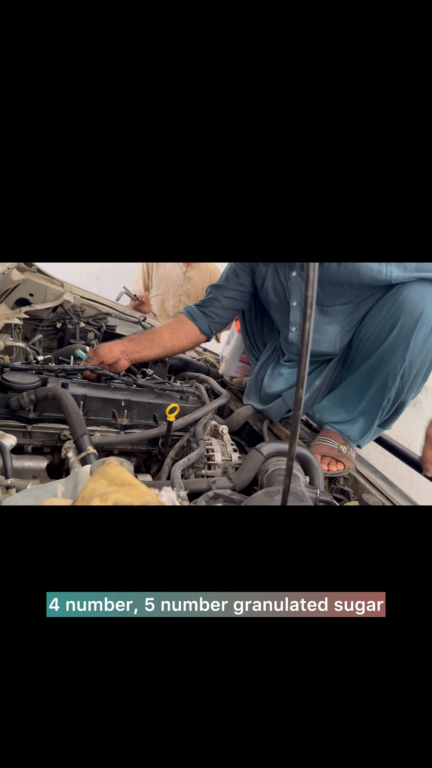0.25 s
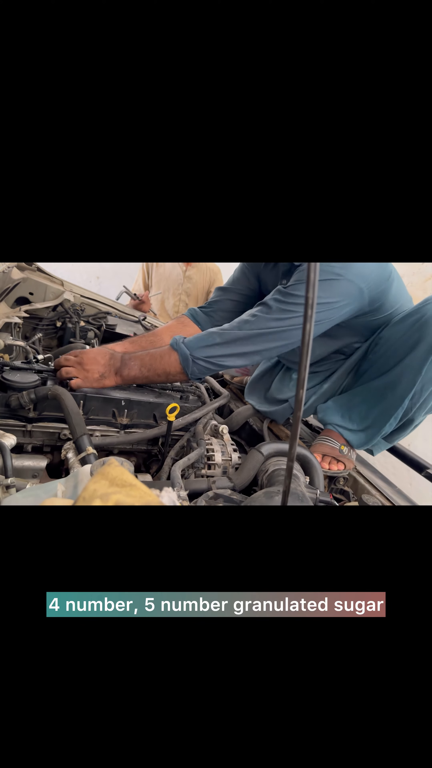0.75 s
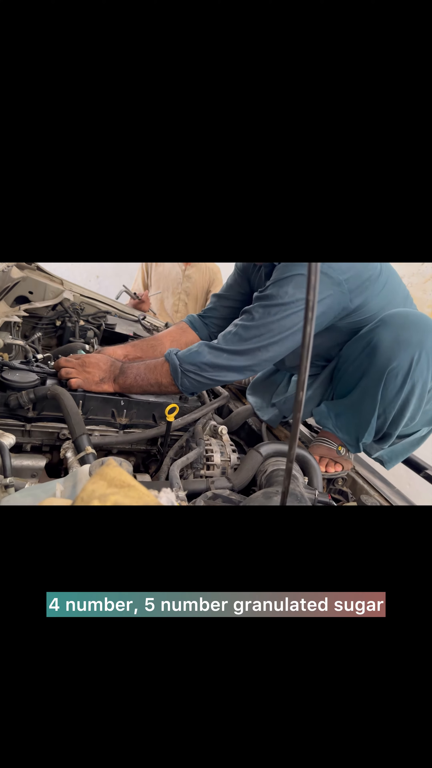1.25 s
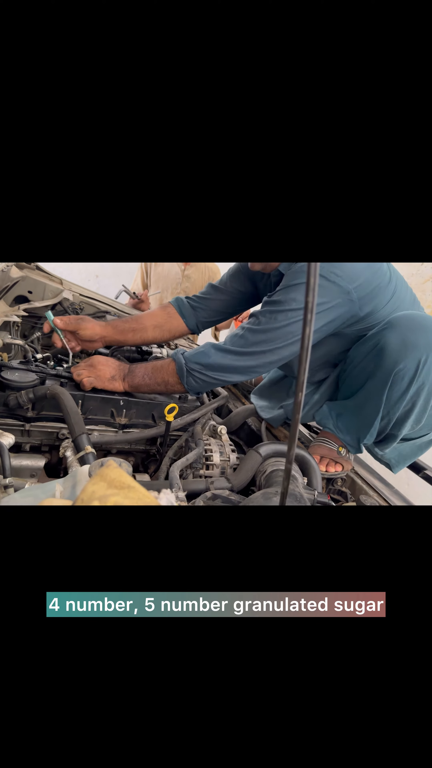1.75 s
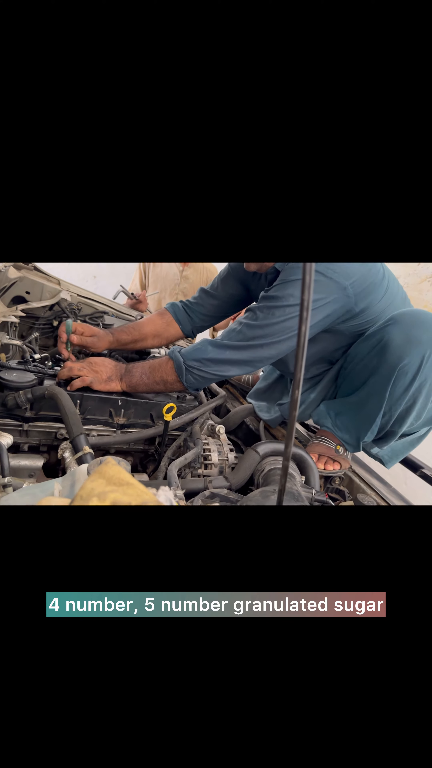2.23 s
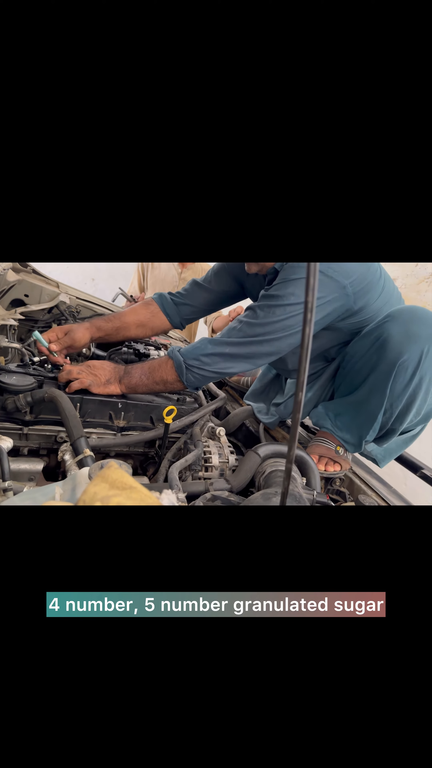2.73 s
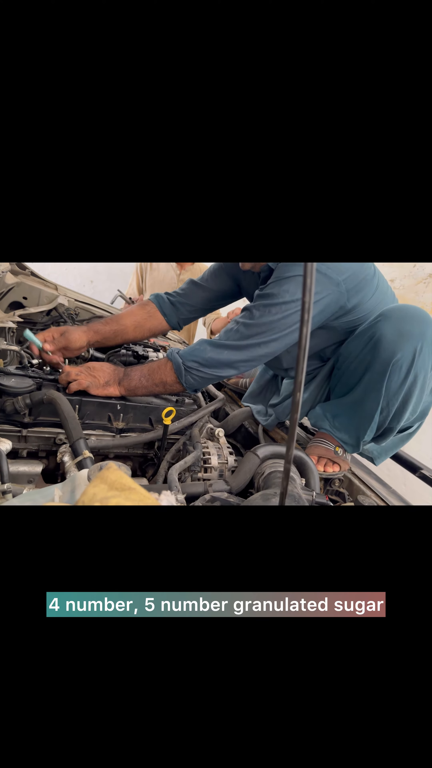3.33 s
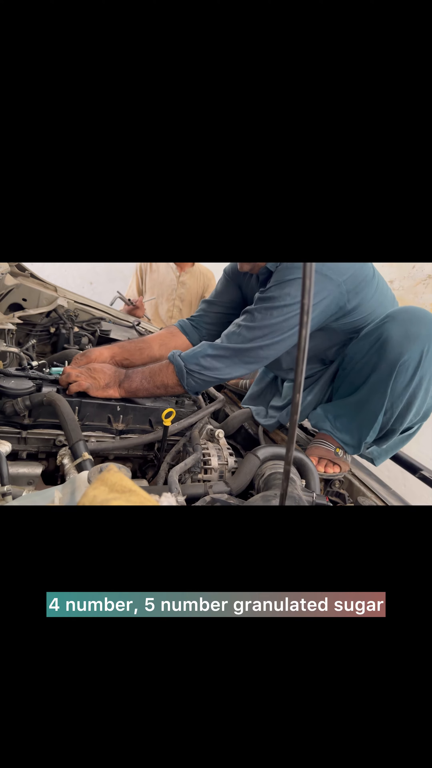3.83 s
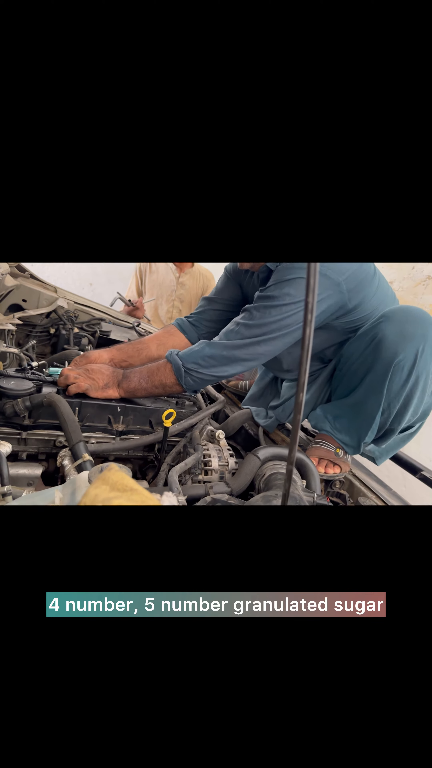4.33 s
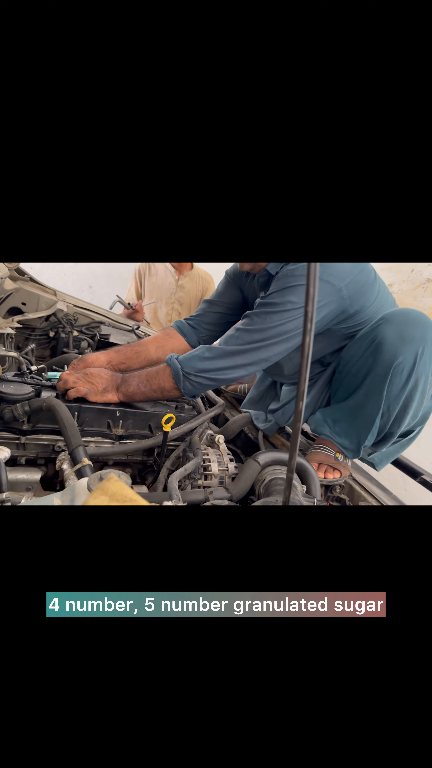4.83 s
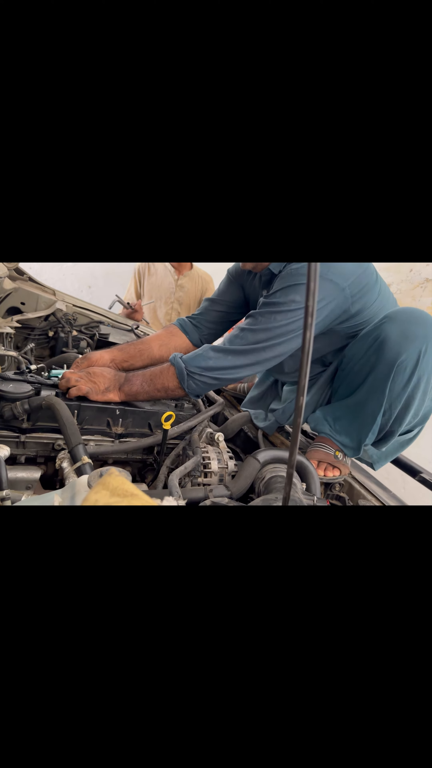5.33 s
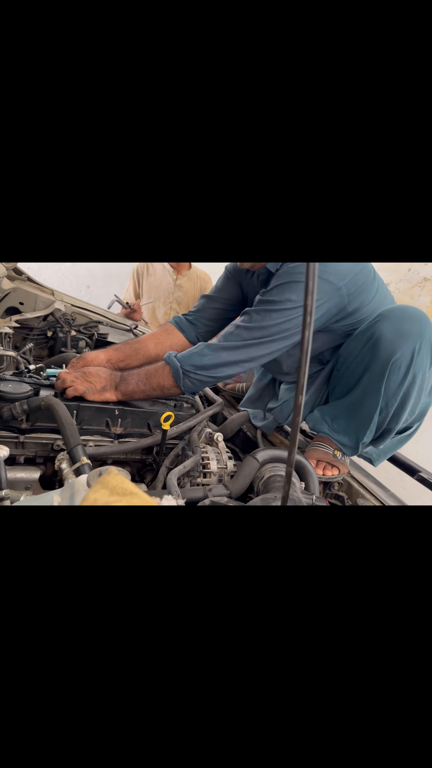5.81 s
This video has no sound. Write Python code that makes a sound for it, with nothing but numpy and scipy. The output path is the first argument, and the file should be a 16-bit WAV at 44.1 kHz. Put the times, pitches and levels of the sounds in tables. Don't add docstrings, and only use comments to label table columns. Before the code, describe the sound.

A five-cylinder diesel idles unevenly up close, hard metallic knocks and sharp ticks over a low hum and a puffing rush of air.

```python
import sys
import numpy as np
from scipy import signal
from scipy.fft import rfft, irfft, next_fast_len
from scipy.io import wavfile
from scipy.ndimage import uniform_filter1d

SR = 44100
rng = np.random.default_rng(int(sys.argv[2]) if len(sys.argv) > 2 else 0)


def voltage_ratio(decibels):
    exponent = np.asarray(decibels, float) / 20
    return 10 ** exponent


def log_audio(samples):
    frames = np.atleast_2d(samples).T
    limited = np.clip(frames, -1, 1)
    pcm = np.round(limited * 32767).astype(np.int16)
    wavfile.write(sys.argv[1], SR, pcm)


N = 267687


def evened(x):
    return x / np.sqrt(np.mean(x ** 2) + 1e-20)


def read(points, hz):
    f, value = np.transpose(points)
    return np.interp(np.log(hz + 1), np.log(f + 1), value)


def drift(rate_hz):
    t = np.arange(0, N + 256, 256) / SR
    f = np.geomspace(rate_hz / 20, rate_hz, num=12)[:, None]
    sines = np.sin(2 * np.pi * (f * t + rng.random(f.shape))) / np.sqrt(f)
    return np.interp(np.arange(N) / SR, t, evened(sines.sum(0)))


# start_s [s], level_db [dB], pitch_hz [Hz], decay_s [s to -60 dB]
BLOWS = [
    (3.17, -55, 592, .6),
    (3.27, -55, 574, 0.45),
    (4.03, -57, 578, 0.46),
    (4.14, -55, 600, 0.37),
    (4.75, -52.5, 594, .5),
    (4.85, -50.5, 595, 0.34),
    (5.6, -58, 590, 0.35),
    (5.64, -50.5, 583, 0.25),
]


def far_blows():
    out, t = np.zeros(N + SR), np.arange(SR) / SR
    soft_start = np.minimum(t / 0.024, 1)
    for start_s, level_db, pitch_hz, decay_s in BLOWS:
        fade = voltage_ratio(level_db + 7.5 - 60 * t / decay_s)
        blow = fade * soft_start * np.sin(2 * np.pi * pitch_hz * t)
        start = round(start_s * SR)
        out[start:start + SR] += blow[:N + SR - start]
    return out[:N]


# multiple [of its speed], level_db [dB rms]
MOTOR_TONES = [(1, -72), (2, -69.5), (5, -72), (7, -55), (9, -63.5), (10, -79), (12, -62), (14, -61.5),
               (16, -64.5)]


def motor_drone():
    speed_hz = 46.71
    out, t = np.zeros(N), np.arange(N) / SR
    for multiple, level_db in MOTOR_TONES:
        waver_db = 1.2 * drift(5.0)
        tone = np.cos(2 * np.pi * (multiple * speed_hz * t + rng.random()))
        out += voltage_ratio(level_db + 3.0 + waver_db) * tone
    return out


# pitch_hz [Hz], decay_s [s to -60 dB], level_db [dB]
SHOP_BANDS = [
    (204, 0.087, -20.5),
    (756, 0.21, 12.5),
    (1870, 0.41, -10.5),
    (2970, 0.46, 8),
    (5660, 0.21, 2.5),
    (9600, 0.17, -2),
    (10500, .1, -60),
]


def shop(x):
    taps = np.zeros((2, SR // 2))
    grid = np.arange(100, SR // 2 - 20, 20)
    at = grid + rng.integers(0, 20, (2, len(grid)))
    np.put_along_axis(taps, at, rng.choice([-1., 1.], at.shape), 1)
    hz, t, z = signal.stft(taps, SR, nperseg=256)
    bands = np.array(SHOP_BANDS)
    decay_s = read(bands[:, [0, 1]], hz)[:, None]
    level_db = read(bands[:, [0, 2]], hz)[:, None]
    tail = signal.istft(z * voltage_ratio(level_db - 60 * t / decay_s), SR, nperseg=256)[1]
    return signal.fftconvolve(x[None], tail / np.linalg.norm(tail[0]), axes=1)[:, :N]


# start_s [s], speed_hz [engine cycles per s]
IDLE_SPEED = [(0.0, 11.255), (0.42, 11.26), (0.85, 11.458), (1.25, 11.354), (1.7, 11.458), (2.05, 11.356),
              (2.42, 11.407), (2.8, 11.329), (3.15, 11.401), (3.47, 11.347), (3.85, 11.434), (4.27, 11.352),
              (4.72, 11.442), (4.97, 11.385), (5.4, 11.476), (6.07, 11.474)]


def crank():
    first_knock_s = .0709
    turns = np.cumsum(np.interp(np.arange(N) / SR, *np.transpose(IDLE_SPEED))) / SR
    return turns - turns[round(first_knock_s * SR)] + 1


# delay_ms [ms], then
# sump_db, block_db, cover_db, head_db, pump_db, pipes_db, injector_db, crack_db [dB]
CYLINDERS = [
    (1.501, -3, -1, 0.5, -2.5, 0.5, 5, -2, -1),
    (2, -5, -6.5, 3.5, -6.5, 1, -2, -2, -8),
    (1.462, -6, -20, -8, -13, -12, -15, -10, -32),
    (.3, 0.5, -12, -4, -3, 1, -7, 5, -8.5),
    (1.288, -11, -39, -11, -9, 1, -1, 9.5, -5),
]


def firings(turns):
    count = len(CYLINDERS)
    at = np.flatnonzero(np.diff(np.floor(turns * count)) > 0)
    cylinder = np.round(turns[at] * count).astype(int) % count
    delay_ms = np.transpose(CYLINDERS)[0][cylinder] + .04 * rng.standard_normal(len(at))
    at = np.clip(at + (delay_ms * SR / 1000).astype(int), 0, N - 1)
    return at, cylinder


# pitch_hz [Hz], level_db [dB per Hz]
RUSH_COLOR = [(40, -49), (70, -5.5), (110, -13), (170, -8.5), (340, -15), (500, -7.5), (900, -13),
              (1300, -10), (1800, -12), (3000, -7.5), (3500, -15), (4650, -18), (7500, -16.5), (10200, -22),
              (15000, -23.5)]
# pitch_hz [Hz], likeness [0-1]
RUSH_LIKENESS = [(100, .995), (260, .96), (500, .65), (900, .5), (1700, .85), (3000, .2), (3700, .5),
                 (5000, .3), (7200, .8), (10000, .75), (10900, .93), (11400, 1), (13300, 1), (14200, .7)]


def rush(turns):
    frames, hz = N // 256 + 5, np.fft.rfftfreq(1024, 1 / SR)
    a, b, c, d, patches = rng.standard_normal((frames, len(hz), 5)).T
    patches = uniform_filter1d(patches, size=10, axis=0)
    patches = evened(uniform_filter1d(patches, size=10, axis=1))
    same = np.clip(read(RUSH_LIKENESS, hz), 0, 1)[:, None]
    left = a + 1j * b
    right = same * left + np.sqrt(1 - same ** 2) * (c + 1j * d)
    z = np.array([left, right]) * voltage_ratio(read(RUSH_COLOR, hz)[:, None] + 0.55 * patches)
    noise = voltage_ratio(-42) * evened(signal.istft(z, nperseg=1024, noverlap=768)[1][:, :N])
    low = signal.lfilter(*signal.butter(2, 900 / (SR / 2)), noise)
    at, cylinder = firings(turns)
    train = np.zeros(N)
    train[at] = voltage_ratio(np.array(CYLINDERS)[cylinder, -1] + 2.0 * rng.standard_normal(len(at)))
    puff = signal.lfilter([1], [1, -np.exp(-1 / (0.0084 * SR))], train)
    return low + (noise - low) * evened(1 + 1.17 * puff)


# multiple [of the cycle rate], level_db [dB rms]
CRANK_ORDERS = [(5.0, -46), (6.0, -62.5), (9.0, -61.5), (10.0, -60.5), (11.0, -70.5), (12.0, -68.5),
                (13.0, -59), (14.0, -81), (15.0, -48.5), (16.0, -56), (17.0, -65), (17.5, -55.5),
                (20.0, -55.5), (21.0, -55), (22.0, -65.5), (24.0, -58), (26.0, -58), (28.0, -57),
                (29.0, -72), (30.0, -52.5), (31.0, -54.5), (33.0, -57.5), (34.0, -57.5), (35.0, -60),
                (36.0, -73), (38.0, -60), (39.0, -74), (44.0, -64.5)]


def crank_hum(turns):
    out = np.zeros(N)
    family = rng.random(len(CYLINDERS))
    for order, level_db in CRANK_ORDERS:
        start = family[int(order) % len(CYLINDERS)] + .1 * rng.standard_normal()
        waver_db = .2 * np.sqrt(order) * drift(6.0)
        wobble = 0.0045 * order * drift(4.0)
        out += voltage_ratio(level_db + 2 + waver_db) * np.cos(2 * np.pi * (order * turns + start + wobble))
    return out


def gears(turns):
    size, change_hz, band_hz = 4096, 1.505, np.array([455, 1610])
    swell = evened(uniform_filter1d(rng.standard_normal((3, size)), size=200))
    loops = rng.standard_normal((3, size)) * voltage_ratio(1.6 * swell)
    place = turns % 1 * size
    out = np.zeros(N)
    for k, loop in enumerate(loops):
        blend = 2 - k + .35 * drift(change_hz)
        out += blend * np.interp(place, np.arange(size), loop, period=size)
    return voltage_ratio(-49) * evened(signal.lfilter(*signal.butter(2, band_hz / (SR / 2), "band"), out))


def cracks(at, level_db, burst_s):
    t = np.arange(400) / SR
    shape = np.exp(-t / burst_s) * np.minimum(t / 0.00046, 1)
    bursts = rng.standard_normal((len(at), len(t))) * shape * voltage_ratio(level_db)[:, None]
    out = np.zeros(N + len(t))
    np.add.at(out, at[:, None] + np.arange(len(t)), bursts)
    return signal.lfilter(*signal.butter(2, [900 / (SR / 2), 6000 / (SR / 2)], "band"), out[:N])


# start_s [s], block_db, head_db [dB]
LEAN = [(0, -42, -43), (.45, -43.5, -42.5), (.7, -41, -46), (1.5, -39.5, -44), (2, -40, -42),
        (2.6, -40.5, -47), (3.3, -40, -43.5), (3.9, -41.5, -48), (4.8, -41, -48.5), (6.07, -42.5, -47)]
SCATTER_DB = [1, 1.5, 2.2, 2.5]
# start_s [s], level_db [dB over the usual]
HARD_BLOWS = [
    [(.428, 5), (.517, 6), (1.745, -1), (3.414, 5), (5.257, 6)],
    [(1.394, 5), (2.622, 7), (2.975, 3), (3.853, 5), (4.204, 10), (4.643, 8), (5.954, 6)],
    [(.055, 5.5), (.587, 5), (1.377, 5), (1.814, 4), (2.254, 8.5), (3.397, 9), (3.485, 7), (3.923, -2),
     (5.239, 5)],
]


def strengths(at):
    s = at / SR
    lean_s, block_db, head_db = np.transpose(LEAN)
    pipes_db = -49 + 0 * s
    injector_db = -51 + 3 * np.exp(-s / 1)
    usual = np.array([np.interp(s, lean_s, block_db), np.interp(s, lean_s, head_db), pipes_db, injector_db]).T
    extra = SCATTER_DB * np.clip(rng.standard_normal(usual.shape), -2, 1)
    for column, hard in enumerate(HARD_BLOWS, start=1):
        for start_s, level_db in hard:
            extra[np.argmin(abs(s - start_s)), column] = level_db
    return usual, extra


def ring(x, hz, t60, rise_s):
    turn = np.exp(2j * np.pi * hz / SR)
    t60 = np.clip(t60, .008, max(7e5 / hz ** 2, .02))
    fade, rise = 10 ** (-3 / (t60 * SR)), np.exp(-1 / (rise_s * SR))
    return signal.lfilter([1 - rise], np.convolve([1, -fade * turn], [1, -rise * turn]), x).real


# pitch_hz [Hz], level_db [dB], decay_s [s to -60 dB]
PARTS = [
    [(830, -56, 0.05), (1000, -55, .04), (1093, -52, 0.06), (1376, -52, 0.04), (1527, -54, 0.05)],
    [(1717, -7.5, 0.08), (1767, -6.5, 0.08), (1815, -4, 0.065), (1873, -6, 0.13)],
    [(2140, -54.5, 0.027), (2322, -52, 0.025), (2515, -55.5, 0.033)],
    [(2660, -9, .05), (2748, -7, .08), (2785, -6, .05), (2838, -6, 0.034), (2968, -10, 0.032),
     (3080, -7, .035)],
    [(4010, -57, 0.02), (4230, -60, 0.03), (4325, -57, 0.04), (4870, -59, 0.011)],
    [(5400, -4.5, .012), (5517, -3.5, 0.018), (5640, -1, 0.024), (5790, -4.5, 0.012)],
    [(7103, -5, 0.0099), (7260, -1, 0.011), (7440, -1.5, .014), (7576, -3, .01)],
]
RATTLE_DB = [-40, -44, -52, -38, -35.5, -32, -39]


def knocks(turns):
    at, cylinder = firings(turns)
    usual, extra = strengths(at)
    force_db = np.array(CYLINDERS)[cylinder, 1:] + .8 * rng.standard_normal((len(at), 1))
    force_db += 1.0 * rng.standard_normal(force_db.shape)
    usual_db = np.zeros(force_db.shape)
    for column, (part, owner) in enumerate([(1, 0), (3, 0), (5, 0), (6, 4)]):
        usual_db[:, part] = usual[:, column]
        steady_db = np.array(CYLINDERS)[owner, part + 1] + extra[:, column]
        force_db[:, part] = np.where(cylinder == owner, steady_db, force_db[:, part])
    out, rattle = np.zeros(N), rng.standard_normal(N)

    def vary(spread):
        return spread * rng.standard_normal(len(at))

    for k, modes in enumerate(PARTS):
        shaking = voltage_ratio(RATTLE_DB[k] + np.interp(np.arange(N), at, usual_db[:, k])) * rattle
        start = 2 * np.pi * rng.random(len(CYLINDERS))[cylinder] + vary(.35)
        for pitch_hz, level_db, decay_s in modes:
            phase = start + .3 * rng.standard_normal(len(CYLINDERS))[cylinder] + vary(.2)
            drive = shaking.astype(complex)
            drive[at] += voltage_ratio(force_db[:, k] + usual_db[:, k] + vary(1.1)) * np.exp(1j * phase)
            out += voltage_ratio(level_db + 7.5) * ring(drive, pitch_hz, decay_s, rise_s=.0018)
    return out + cracks(at, force_db[:, -1] - 55, burst_s=0.0022)


def scene():
    turns = crank()
    tones = far_blows() + motor_drone() + crank_hum(turns)
    metal = gears(turns) + knocks(turns)
    echoes = voltage_ratio(-7.5) * shop(metal) + voltage_ratio(-8.5) * shop(tones)
    return metal + tones + echoes + rush(turns)


# pitch_hz [Hz], lead_rad [radians the left leads]
PORT_LEAD = [(250, 0), (520, -.4), (2070, .1), (3100, .5), (4900, .3), (5680, -.6), (7750, -1.7),
             (9650, -1.9), (10600, -np.pi), (13600, -np.pi), (15700, -4.4)]


def spaced_ports(dry):
    size = next_fast_len(N)
    hz = np.fft.rfftfreq(size, 1 / SR)
    turn = np.exp(.5j * read(PORT_LEAD, hz))
    return irfft(rfft(dry, size) * np.array([turn, 1 / turn]) * (hz < 15780), size)[:, :N]


def roll_off(x):
    return signal.sosfilt(signal.butter(12, 16750, fs=SR, output="sos"), x)


def record(dry):
    mix = spaced_ports(dry)
    return roll_off(mix)


dry = scene()
out = record(dry)
log_audio(out)
```